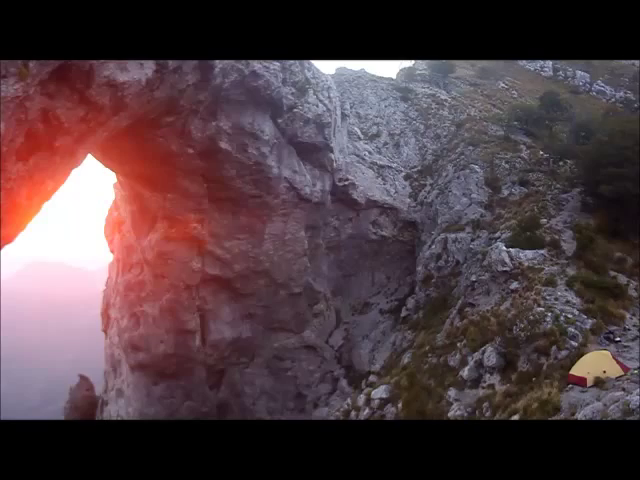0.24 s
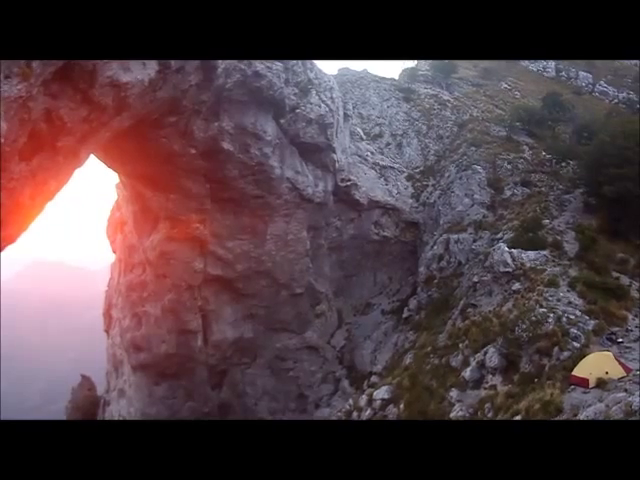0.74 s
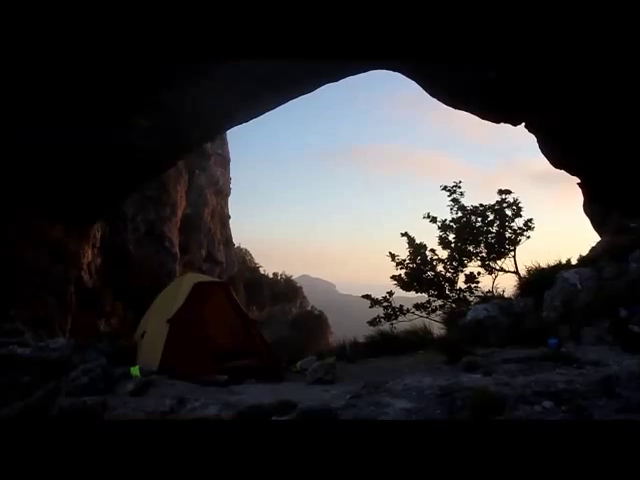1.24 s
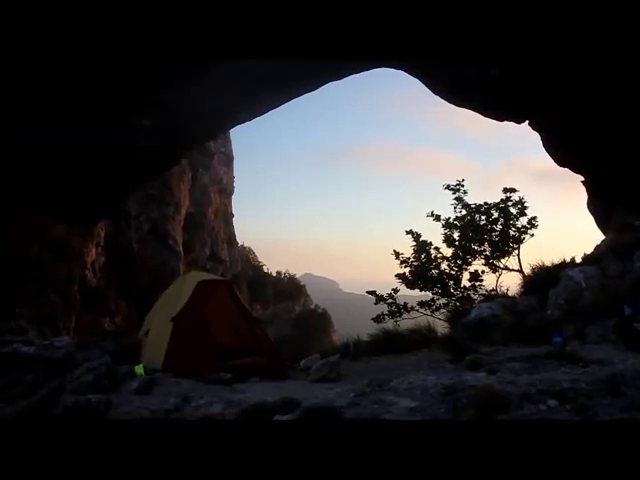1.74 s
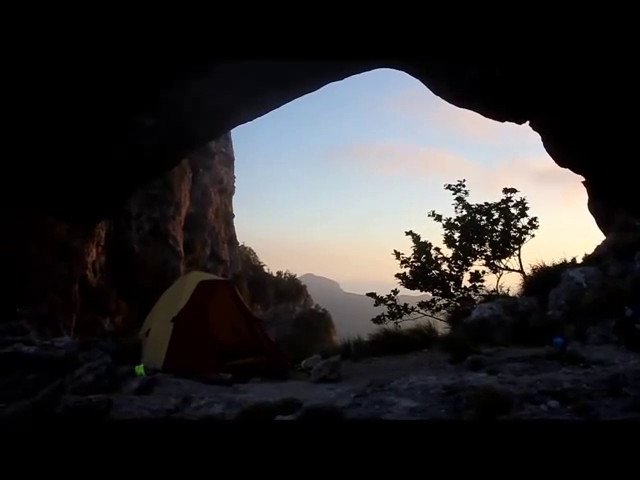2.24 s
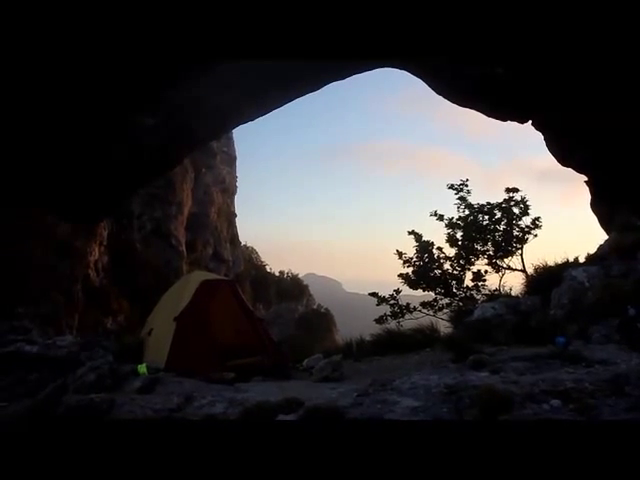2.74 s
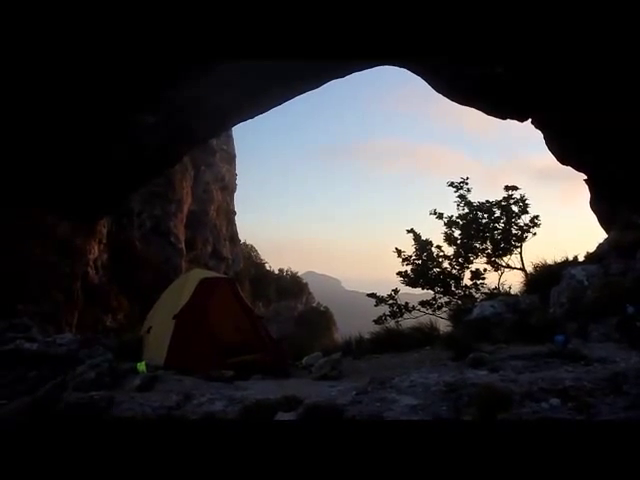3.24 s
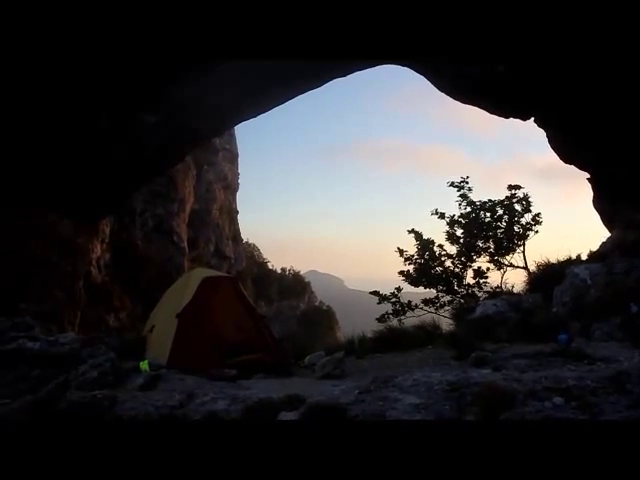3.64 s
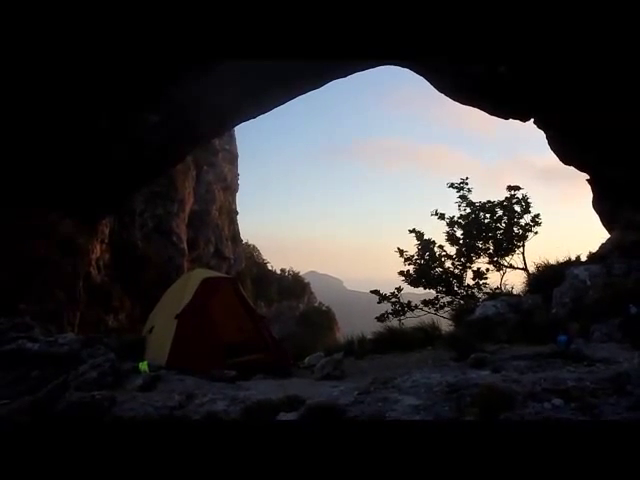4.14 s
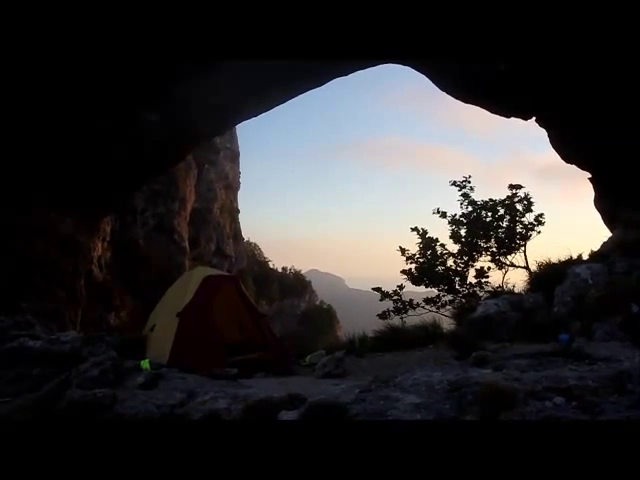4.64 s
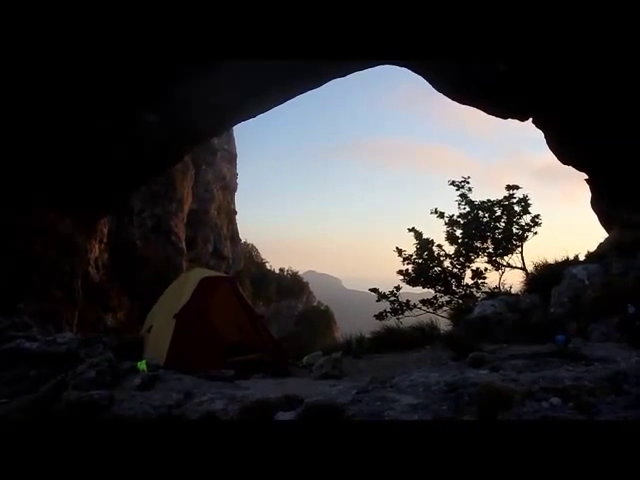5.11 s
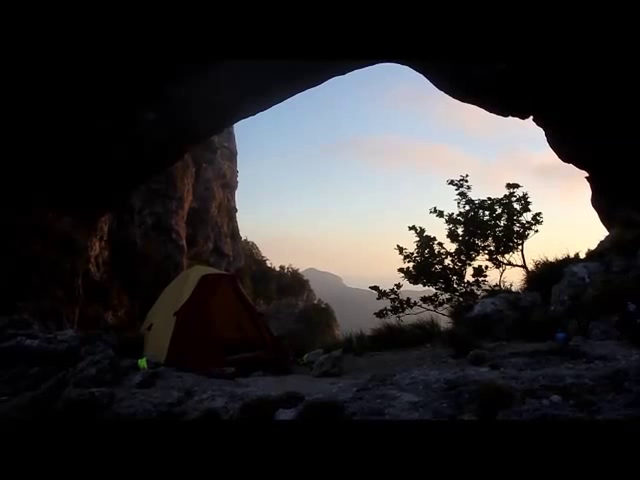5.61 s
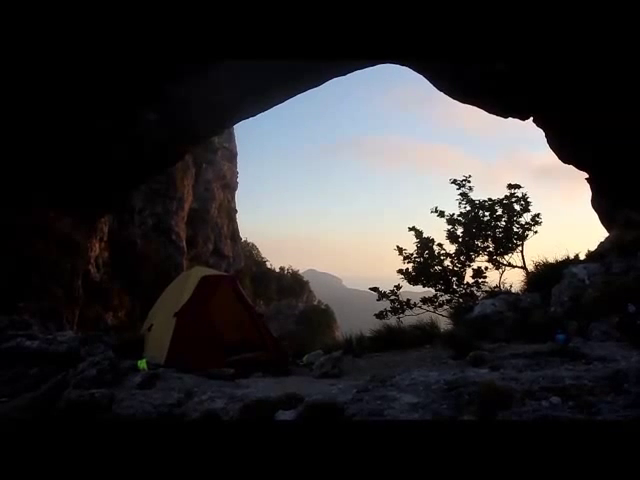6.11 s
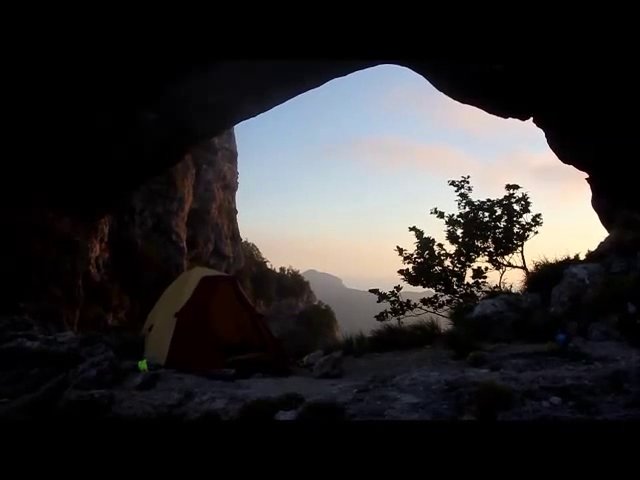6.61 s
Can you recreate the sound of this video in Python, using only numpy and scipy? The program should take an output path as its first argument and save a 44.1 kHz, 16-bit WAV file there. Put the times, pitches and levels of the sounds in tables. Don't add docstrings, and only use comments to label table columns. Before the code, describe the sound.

From 0 to 1.2 seconds, a very faint microphone hiss and airy wash hold barely audible, very high rasps of distant bush-crickets on a rocky slope. The sound cuts to a tiny silence, and at 1.22 it reopens with somewhat louder air, a crisp close insect stroke and a bird's rapid falling warble lasting about a tenth of a second. Brighter rasps swell around 2, then a near singer gives three grainy pulses at 2.2-2.5. Faint downward bird peeps come near 1.9-2.2. Softer distant chirps fill 2.6-3.3, brighter ones 3.4-3.7, and near pulses with dry snapping ticks 4.3-4.7. A soft low wind bump falls near 5.2, with bright rasps and faint peeps to 5.6. Three strong close chirps at 5.9-6.2 are loudest; near pulses, peeps and fading snaps follow until about 6.86. Short weak rock echoes surround everything.

```python
import sys
import numpy as np
from scipy import signal
from scipy.io import wavfile
from scipy.ndimage import uniform_filter1d

SR = 44100
rng = np.random.default_rng(int(sys.argv[2]) if len(sys.argv) > 2 else 0)


def dump(signal):
    limited = np.clip(np.atleast_2d(signal).T, -1, 1)
    pcm = np.round(limited * 32767).astype(np.int16)
    wavfile.write(sys.argv[1], SR, pcm)


def volts(x):
    e = np.asarray(x, float) / 20
    return 10 ** e


N = 302790
RESUME_S = 1.2222

# start t/s, length/s, peak effort level/dB, place of the peak in the stroke 0-1,
# wing ring at the start f/Hz
CLOSE = [
    (1.234, 0.058, -28.5, 0.14, 11930),
    (5.929, 0.056, -33, 0.45, 11300),
    (6.028, 0.061, -23.5, 0.31, 11650),
    (6.132, 0.061, -23, 0.18, 11900),
]
NEAR = [(2.24, 0.068, -41.5, .55, 11200), (2.357, 0.07, -34, .3, 11750), (2.475, .074, -36, 0.2, 11900),
        (4.395, 0.059, -40.5, .5, 11100), (4.5, 0.075, -34, 0.24, 11700), (4.619, .08, -34.5, 0.054, 11700),
        (6.198, .03, -42, .05, 11000), (6.274, 0.072, -33.5, 0.27, 11900),
        (6.397, 0.077, -34.5, 0.19, 11900)]
SNAPPING = [(4.35, 0.055, -41.5, .02, 10000), (4.455, 0.062, -42, .02, 10300),
            (6.642, 0.056, -42.5, .02, 10300), (6.748, 0.068, -43, .02, 10500),
            (6.858, .02, -56, .02, 9600)]
MIDDLE = [(1.856, .107, -49, 0.46, 11100), (2.71, 0.088, -47.5, .02, 11300),
          (2.818, 0.096, -47.5, .03, 11300), (4.249, 0.068, -48.5, 0.51, 10900),
          (4.592, 0.029, -48, 0.45, 11800), (5.008, 0.076, -47.5, .05, 11600),
          (5.115, 0.078, -47, .08, 11700)]
FAR = [(1.299, 0.094, -56, .05, 10600), (1.395, 0.11, -56.5, .2, 10900), (1.535, 0.059, -65, .55, 11000),
       (1.616, 0.056, -54.5, .2, 10500), (1.695, 0.094, -54.5, .05, 10900), (1.783, .057, -52, .4, 11200),
       (2.61, .05, -59, .45, 11000), (2.953, .067, -60, .15, 12600), (3.06, .08, -55, .35, 12800),
       (3.169, 0.068, -53.5, .1, 12100), (3.255, .035, -57, .15, 12400), (3.33, 0.09, -52, 0.66, 10200),
       (3.925, .025, -63, .3, 12300), (4.165, .055, -59, .4, 10600), (4.705, 0.13, -54.5, .05, 10900),
       (4.819, 0.067, -55, .15, 11400), (4.908, .05, -57, .5, 11400), (5.213, .077, -52, 0.33, 10000),
       (5.815, 0.031, -57, .3, 9900), (5.886, 0.059, -53, 0.4, 9900), (6.477, 0.067, -56, .1, 11300),
       (6.54, 0.061, -52.5, .2, 10400)]
FIRST_VIEW = [(.155, .077, -62, .3, 12300), (.272, .078, -60, .05, 12600), (.285, .05, -64, .3, 10000),
              (.38, 0.097, -62, .2, 10700), (.51, .08, -65, .2, 12600), (.56, .05, -68, .3, 10800),
              (.646, 0.067, -64, .1, 11500), (.78, .055, -68, .4, 11100), (.875, .065, -68, .45, 11000),
              (1.02, .06, -66, .4, 11400), (1.11, .073, -65, .55, 11100)]
BRIGHT = [(1.97, 0.12, -43.5, 0.24, 10060), (2.098, 0.1, -41, 0.23, 10700), (3.408, 0.095, -47, 0.33, 9900),
          (3.469, 0.1, -42, 0.49, 10100), (3.6, 0.13, -45, 0.14, 10260), (5.323, .11, -43.5, 0.25, 10460),
          (5.448, 0.084, -43, 0.35, 11300), (5.578, 0.062, -48, .3, 11100)]


def evened(x):
    return x / np.sqrt(np.mean(x ** 2) + 1e-20)


def add(mix, s, sound):
    part = mix[round(s * SR):][:len(sound)]
    part += sound[:len(part)]


def swells(rows):
    t = np.arange(N // 64 + 2) * 64 / SR
    power = sum(volts(db - abs(fall_db) * abs(t - s)) ** 2 for s, db, fall_db in rows)
    return np.interp(np.arange(N) / SR, t, np.sqrt(power))


def hiss(spectrum, patchy_db):
    hz = np.fft.rfftfreq(1024, 1 / SR)
    a, b, patches = rng.standard_normal((N // 256 + 5, 513, 3)).T
    patches = uniform_filter1d(patches, 14, 0)
    patches = evened(uniform_filter1d(patches, 16, 1))
    f, db = np.transpose(spectrum)
    colour_db = np.interp(np.log(hz + 1), np.log(f + 1), db)
    bins = (a + 1j * b) * volts(colour_db[:, None] + patchy_db * patches)
    noise = signal.istft(bins, nperseg=1024, noverlap=768)[1]
    return evened(noise[:N])


def air():
    # f/Hz, density level/dB
    first_air = [(15, -45), (25, -18), (205, -2.5), (447, -1.5), (498, -5), (2080, -11.5), (8680, -15.5),
                 (11700, -14.5), (15700, -22)]
    # f/Hz, density level/dB
    second_air = [(15, -47), (25, -35), (140, 0.5), (275, 1), (650, -3), (1200, -8), (2650, -11),
                  (5000, -11.5), (7580, -14.5), (11100, -16), (12700, -16.5), (15700, -21.5)]
    # t/s, level/dB
    settling = [(1.22, -1), (1.45, -1.5), (1.7, 0), (2.2, 0.5), (6.87, 0.5)]
    t = np.arange(N) / SR
    first = volts(-60) * hiss(first_air, patchy_db=-0.5)
    second_db = -53.5 + np.interp(t, *np.transpose(settling))
    second = volts(second_db) * hiss(second_air, patchy_db=0.45)
    return np.where(t < RESUME_S, first, second)


def resonate(x, hz, width):
    turn = np.exp(2j * np.pi * np.cumsum(hz * np.ones(len(x))) / SR)
    r = np.exp(-np.pi * width / SR)
    smooth = signal.lfilter([1], np.poly([r, r, r, r]), x / turn)
    return evened((turn * smooth).real)


def stroke(length_s, peak_db, peak_at, from_hz, climb_hz, swell_db, fade_db, upper_db, lower_db, even, blur):
    teeth_per_s, tooth_jitter, tooth_spread_db, pitch_scatter = 320, .42, 1, 0.053
    frame_hz = 10710
    # typical delay t/s, level/dB
    ground = [
        (.0012, -30),
        (.0022, -18),
        (.0035, -26),
    ]

    even, blur = np.clip([even, blur], 0, 1)
    gap, size, pitch, tilt, stones = rng.standard_normal((80, 5)).T
    scatter = rng.standard_normal((6000, 2)).T
    length = int(np.clip(length_s, .01, .13) * SR)
    u = np.arange(length + 200) / length
    tilt = np.tanh(tilt) * (1 - .6 * blur)

    gap = np.exp(tooth_jitter * (1 - .6 * even) * gap)
    at = (np.cumsum(gap) - gap[0]) * SR / teeth_per_s
    at = at[at < length].astype(int)
    tooth = np.searchsorted(at, np.arange(len(u)), "right") - 1
    clicks = np.zeros(len(u))
    clicks[at] = volts(tooth_spread_db * size[:len(at)])

    copies = scatter[0, :len(u)] * (abs(scatter[1, :len(u)]) > 1.5) * (u < 1)
    drive = np.sqrt(1 - blur ** 2) * evened(clicks) + blur * evened(copies)
    drive *= np.minimum((u + .01) / (.06 * blur ** 2 + .01), 1)

    upper_drive, lower_drive, tick_drive = [np.roll(drive, round(samples * even ** 2)) for samples in (55, 5, 20)]
    climb = climb_hz * (1.77 * u ** 0.68 - .25) * (1 - 0.41 * even)
    hz = (from_hz + climb) * (1 + pitch_scatter * (1 - 0.88 * even) * pitch[tooth])
    ring_db = 21.4 * even - 11.0 - 3.1 * u
    ring = volts(ring_db) * resonate(drive, hz, 900 * (1 + 0.36 * even))
    tick = resonate(tick_drive, frame_hz + 0.43 * (hz - frame_hz), width=4770)
    wing = evened(ring + tick)
    upper_db = upper_db + 14.0 + 4.9 * tilt[tooth] + 3.4 * (u - 5.5)
    upper = volts(upper_db) * resonate(upper_drive, hz=14600, width=3300)
    lower = volts(lower_db - 4.5 * tilt[tooth]) * resonate(lower_drive, hz=7700, width=4200)

    echoes = np.zeros(400)
    echoes[0] = 1
    for (s, db), place in zip(ground, stones):
        delay = round(s * np.exp(.25 * place) * SR)
        echoes[min(delay, 399)] += volts(db - 8.7 * even)
    before_peak = np.maximum(peak_at - u, 0)
    after_peak = np.maximum(np.minimum(u, 1) - peak_at, 0)
    level = volts(peak_db - swell_db * before_peak - fade_db * after_peak)
    return np.convolve(level * (wing + upper + lower), echoes / np.linalg.norm(echoes))


def far_chorus():
    # t/s, peak level/dB, fall either side/(dB per s)
    chorus = [(1.44, -57, 30), (2.03, -38, 60), (3.0, -52.5, 8), (3.6, -47, 70), (4.52, -42.5, 47),
              (5.42, -45.5, 42), (6.38, -48, 24)]
    clicks = rng.standard_normal(N) * (rng.random(N) < .1)
    far = resonate(clicks, hz=11400, width=7200)
    return volts(-10.5) * swells(chorus) * (np.arange(N) > RESUME_S * SR) * far


def rock_walls(x):
    level_db, t60_s = -17, 0.11
    t = np.arange(SR // 4) / SR
    space = rng.standard_normal(len(t)) * (rng.random(len(t)) < .1) * volts(-60 * t / t60_s) * (t > .004)
    space *= volts(level_db) / np.linalg.norm(space)
    space[0] = 1
    return signal.oaconvolve(x, space)[:N]


def crickets():
    # strokes, lowest radiated f/Hz, ring climb/(Hz a stroke), swell and fade/(dB a stroke), upper band
    # level/dB, lower band level/dB, evenness of the stroke 0-1, blur by scattered copies 0-1
    singers = [(CLOSE, 6200, 760, 38, 8.7, -6, -18.5, .9, 0.49),
               (NEAR, 8540, 1550, 26, 15.7, -8, -21, .4, 0.33),
               (SNAPPING, 8600, 2800, 9, 8.8, -13, -25, 0.36, 0.07),
               (MIDDLE, 5900, 670, 8.8, 13, -5, -16, .3, 0.89),
               (BRIGHT, 7450, 2200, 13, 15, -1.5, -22, .5, 0.81),
               (FAR, 7800, 720, 9, 13, -8, -15, .35, 0.45),
               (FIRST_VIEW, 8900, 990, 13, 13, -6, -20, .35, 0.81)]
    dry = far_chorus()
    for strokes, lowest_hz, *singer in singers:
        song = np.zeros(N)
        for start, *row in strokes:
            add(song, start, stroke(*row, *singer))
        dry += signal.sosfilt(signal.butter(18, lowest_hz, "highpass", fs=SR, output="sos"), song)
    return rock_walls(dry)


def wind():
    # t/s, peak level/dB, fall either side/(dB per s)
    gusts = [(.48, -76, 60), (1.26, -66, 180), (1.45, -66, 70), (1.64, -68, 180), (2.3, -74, 4),
             (3.0, -71, 12), (4.33, -68, 45), (4.53, -69, 110), (4.77, -70, 70), (4.96, -63, 55),
             (5.24, -47, 270), (5.4, -67, 35), (5.9, -73, 90), (6.04, -71, 130), (6.86, -75, 45)]
    # t/s, length/s, level/dB, f/Hz
    puffs = [
        (1.225, 0.028, -70, 69.6),
        (3.16, 0.042, -67, 80),
        (4.29, 0.049, -60.5, 116),
        (5.85, 0.092, -64, 107),
    ]
    low_band = signal.butter(3, [25, 90], "bandpass", fs=SR, output="sos")
    lumps = signal.sosfilt(low_band, rng.standard_normal(N))
    breeze = volts(-83)
    out = volts(-5.0) * np.hypot(breeze, swells(gusts)) * evened(lumps)
    for start, length, db, hz in puffs:
        t = np.arange(0, length, 1 / SR)
        add(out, start, volts(db) * np.hanning(len(t)) * 2 * np.sin(2 * np.pi * hz * t))
    return out


def tone(hz):
    return np.sqrt(2) * np.sin(2 * np.pi * np.cumsum(hz) / SR)


def warble(out):
    # t/s, level/dB, top f/Hz
    contour = [(1.224, -52.5, 1765), (1.26, -53.5, 1700), (1.299, -53, 1656), (1.335, -51.5, 1587),
               (1.352, -57, 1437), (1.365, -73, 1350)]
    beats_per_s, dip_hz, phase, last_s = 44.4, 360, .33, 1.345
    s, db, hz = np.transpose(contour)
    t = np.arange(s[0], s[-1], 1 / SR)
    beat = (beats_per_s * (t - s[0]) + phase) % 1
    dip = (np.exp(-beat / .25) + np.exp((beat - 1) / .06)) * (t < last_s)
    pitch = np.interp(t, s, hz) - dip_hz * uniform_filter1d(dip, 60)
    pitch += 40 * evened(uniform_filter1d(rng.standard_normal(len(t)), 90))
    add(out, s[0], volts(np.interp(t, s, db) + 5.5 - 6.5 * dip) * tone(pitch))


def peeps(out):
    # t/s, length/s, level/dB, start f/Hz, end f/Hz
    calls = [(1.311, 0.013, -58, 2400, 2270), (1.35, 0.017, -58, 1890, 1600),
             (1.893, 0.033, -64, 2040, 1870), (2.01, 0.03, -57, 2260, 1800), (2.15, 0.034, -66, 2086, 1880),
             (5.222, 0.028, -63, 2180, 2080), (5.49, .03, -62, 2110, 2070), (5.615, .025, -63, 2300, 2080),
             (6.133, 0.039, -62, 2280, 2000), (6.255, .024, -62, 2300, 2170),
             (6.275, 0.02, -63, 2190, 2070), (6.4, .032, -63, 2230, 2120)]
    for start, length, db, from_hz, to_hz in calls:
        count = round(length * SR)
        glide = np.linspace(from_hz, to_hz, count)
        add(out, start, volts(db + 2.5) * signal.windows.tukey(count, .6) * tone(glide))


def birds():
    out = np.zeros(N)
    warble(out)
    peeps(out)
    t = np.arange(SR // 3) / SR
    valley = rng.standard_normal(len(t)) * volts(-60 * t / 0.65) * (t > .02)
    return out + volts(-12) * signal.oaconvolve(out, valley / np.linalg.norm(valley))[:N]


def scene():
    return (air() + crickets() + wind() + birds())[None]


def band_limit(x):
    return signal.sosfilt(signal.butter(12, 16950, fs=SR, output="sos"), x)


def record(dry):
    cut_s, silent_s, end_s, leftover_db = 1.1893, 1.204, 6.864, -27
    t = np.arange(N) / SR
    between = volts(leftover_db) * (t < silent_s) + (t > RESUME_S) * (t < end_s)
    gate = np.where(t < cut_s, 1, between)
    lowpass = signal.firwin(511, 15800, window=("kaiser", 7), fs=SR)
    limited = signal.oaconvolve(dry, lowpass[None], "same")
    return band_limit(limited * uniform_filter1d(gate, 30))


dry = scene()
out = record(dry)
dump(out)
```